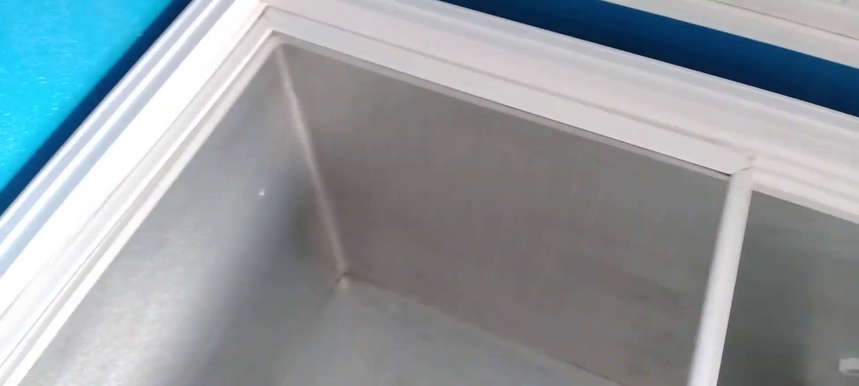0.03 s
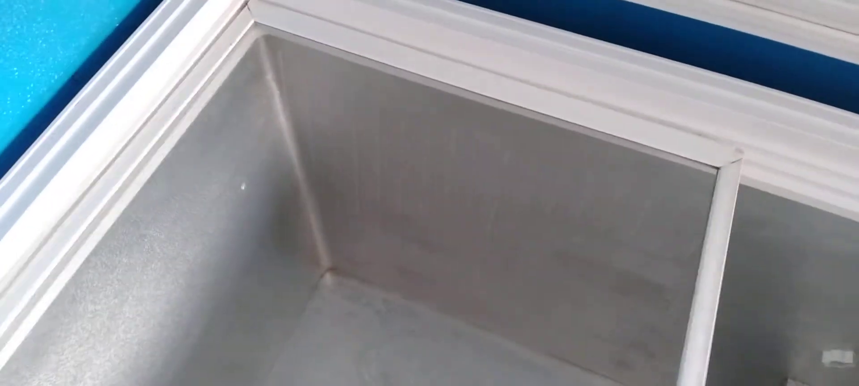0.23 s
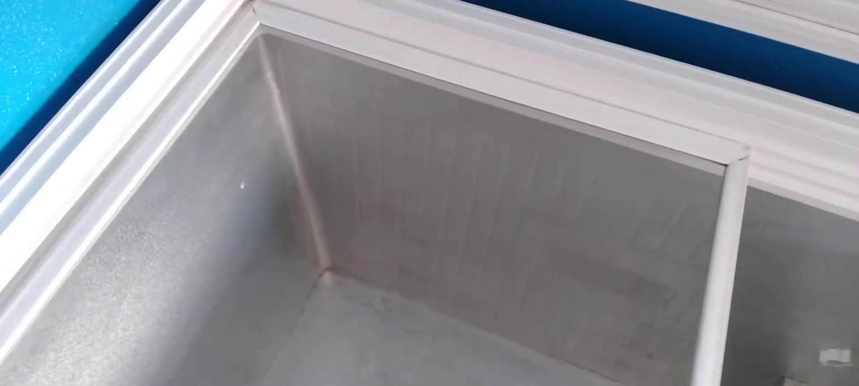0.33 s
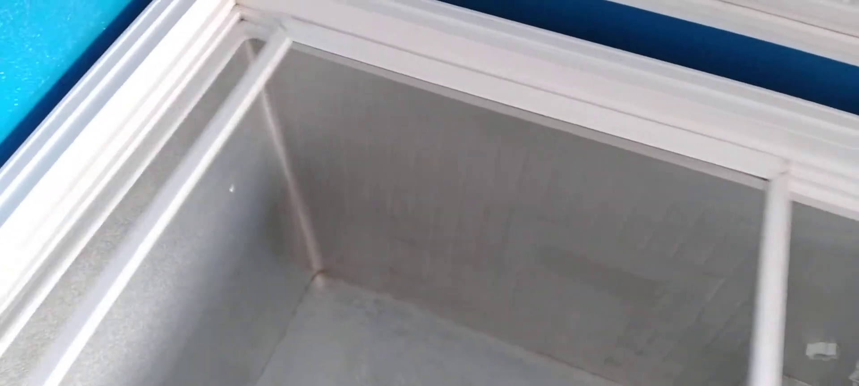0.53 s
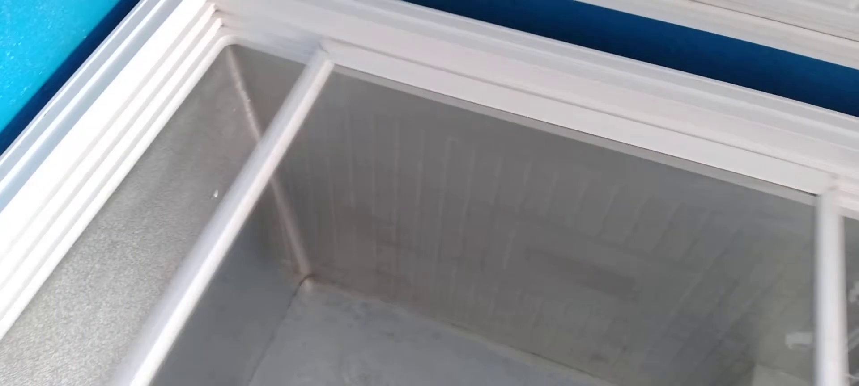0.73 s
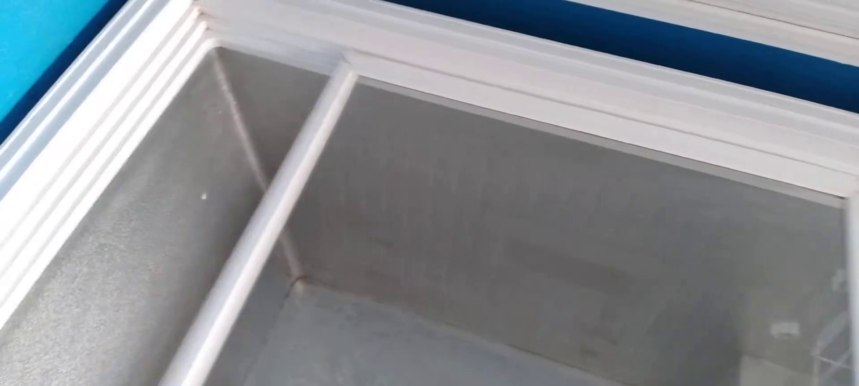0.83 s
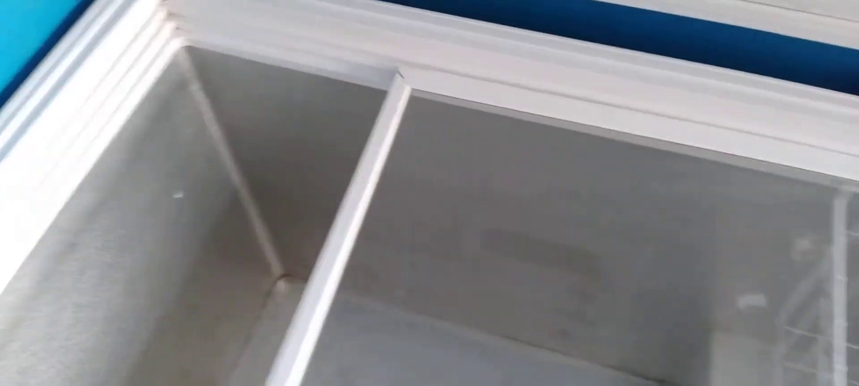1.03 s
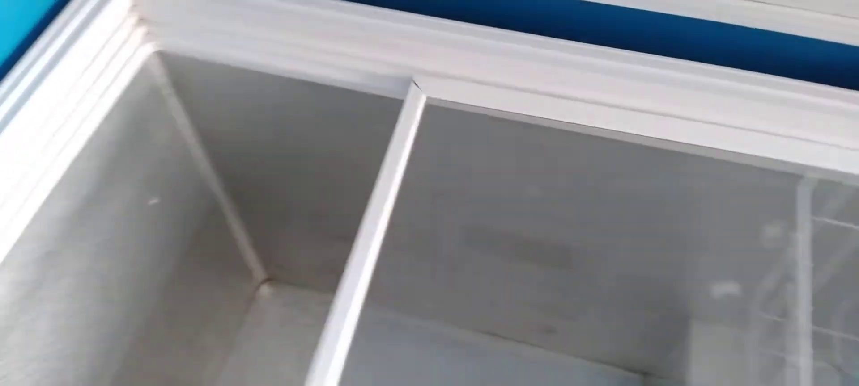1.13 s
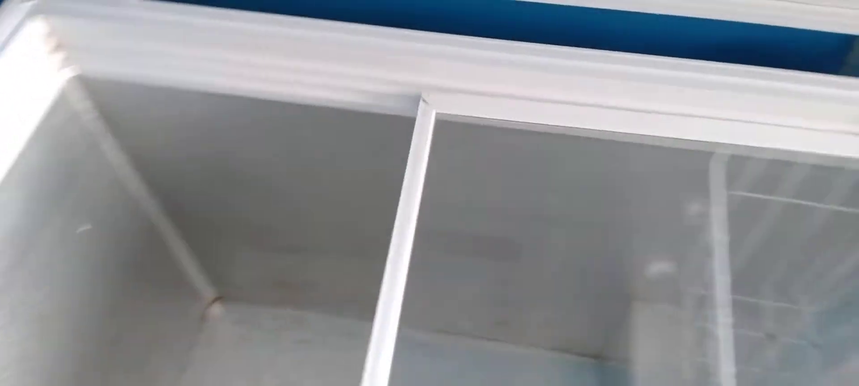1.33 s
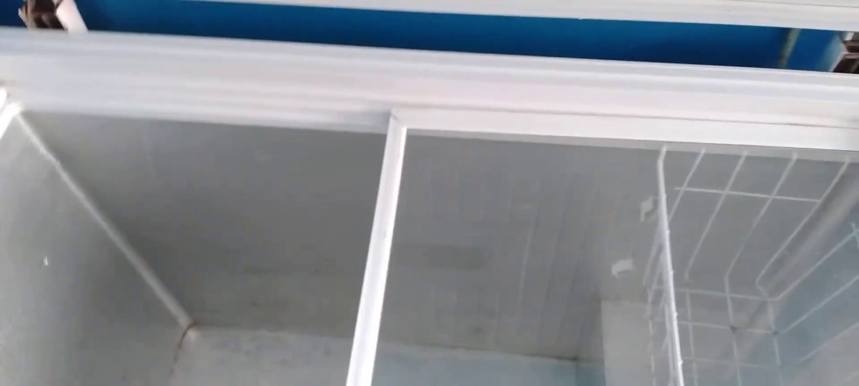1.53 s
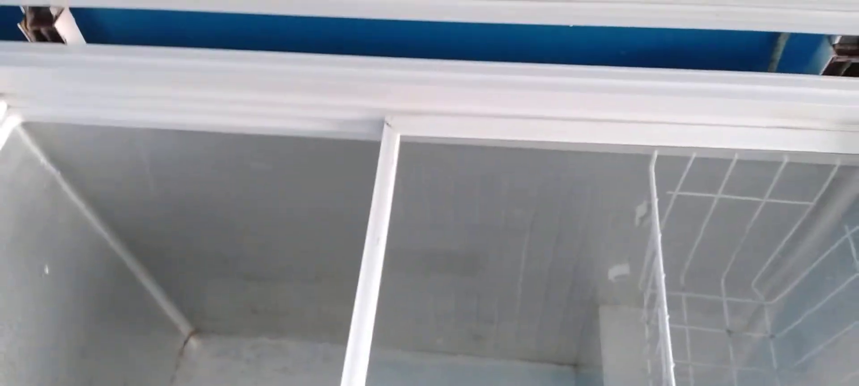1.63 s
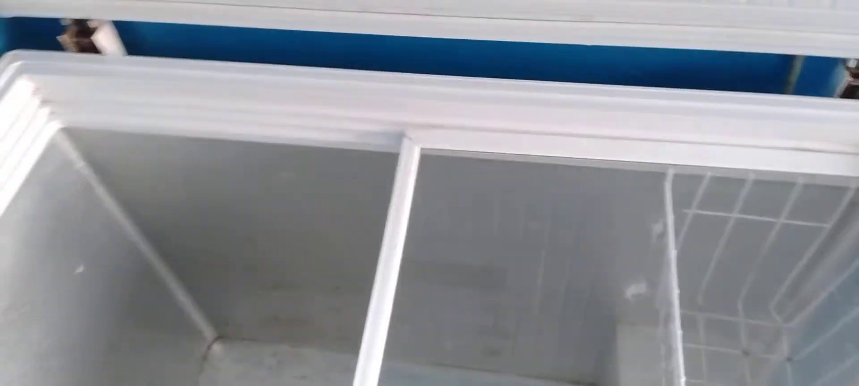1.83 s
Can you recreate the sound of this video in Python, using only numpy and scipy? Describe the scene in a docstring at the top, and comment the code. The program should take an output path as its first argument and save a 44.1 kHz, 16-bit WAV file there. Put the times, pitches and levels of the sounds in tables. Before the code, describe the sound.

Close stereo pickup in a small live room: a glass lid on a hollow cabinet bumps loose, hisses gritty along the track, strikes the end sharply and rattles out, with steady appliance hum and faint whine beneath.

```python
"""Sliding glass lid on a hollow cabinet

A glass lid jerks loose with a few thumps, hisses along its rails, knocks against its stop and leaves ticks.
Blows are soft pushes into cabinet modes plus noise bursts into glass modes; the slide is noise and grit.
Fan noise and a thin motor whine, a sine with its octave, fill the room. Two unlike microphone ports.
"""
import sys
import numpy as np
from scipy import signal
from scipy.fft import rfft, irfft
from scipy.io import wavfile
from scipy.ndimage import uniform_filter1d

SR = 44100
rng = np.random.default_rng(int(sys.argv[2]) if len(sys.argv) > 2 else 0)


def to_wav(sig):
    """Store sig (one row per channel, or 1-D mono) as 16-bit WAV at the path in sys.argv[1].

    Samples outside -1..1 are clipped; the rate is SR.
    """
    pcm = np.clip(np.atleast_2d(sig), -1, 1) * 32767
    pcm = np.round(pcm).astype(np.int16)
    wavfile.write(sys.argv[1], SR, pcm.T)  # frames by channels


N = 83790
TIME_S = np.arange(N) / SR
BINS_HZ = np.fft.rfftfreq(2 * N, 1 / SR)
STOP_AT_S = 1.403  # lid meets its stop


def amp(db):
    """dB to gain."""
    return 10 ** (np.asarray(db) / 20)


def evened(x):
    """Scales to rms 1."""
    return x / np.sqrt(np.mean(x ** 2) + 1e-20)


def read(points, hz):
    """Interpolates a table over log frequency."""
    f, value = np.transpose(points)
    return np.interp(np.log(hz + 1), np.log(f + 1), value)


def curve(rows, column):
    """Interpolates one table column over time."""
    rows = np.array(rows)
    return np.interp(TIME_S, rows[:, 0], rows[:, column])


def colour(x, db):
    """Filters by a gain in dB on the bins of a doubled-length spectrum."""
    return irfft(rfft(x, 2 * N) * amp(db), 2 * N)[..., :N]


def convolved(x, response):
    """Convolves along time, cut to the scene length."""
    return signal.fftconvolve(x, response, axes=1)[:, :N]


def highpass(x, order, cutoff_hz):
    """Butterworth high-pass."""
    return signal.sosfilt(signal.butter(order, cutoff_hz, 'high', fs=SR, output='sos'), x)


# Left-right likeness. Each row: frequency in Hz, correlation from -1 to 1.
LIKENESS = [(60, 0.98), (150, 0.94), (380, 0.91), (950, 0.12), (2380, -0.081), (5980, 0.0034),
            (15000, 0.055)]


def pair(a, b):
    """Two ports: alike in the bass, nearly unrelated in the treble."""
    same = np.clip(read(LIKENESS, BINS_HZ), -1, 1)
    spectrum = same * rfft(a, 2 * N) + np.sqrt(1 - same ** 2) * rfft(b, 2 * N)
    return np.array([a, irfft(spectrum, 2 * N)[:N]])


RISE_CYCLES = 0.31


def ring(modes):
    """Half a second of dying sines; each takes part of a cycle to build up."""
    t = np.arange(SR // 2) / SR
    total = np.zeros(len(t))
    for hz, db, t60_s in modes:
        decay = amp(db - 60 * t / t60_s)
        rise = 1 - np.exp(-t * hz / RISE_CYCLES)
        total += decay * rise * np.sin(2 * np.pi * hz * t)
    return total


def grit(per_s, spread_db):
    """Sparse clicks at random times, of uneven size."""
    size = rng.standard_normal((2, N)) * amp(spread_db * rng.exponential(1, (2, N)))
    return size * (rng.random((2, N)) < per_s / SR)


# Room decay. Each row: frequency in Hz, t60 in s.
ROOM_DECAY = [(500, 0.49), (2000, 0.39), (5000, 0.35), (9000, 0.35), (14000, 0.31)]


def room(x):
    """Noise tail, each band dying at its own speed, another for each port."""
    hz, t, bands = signal.stft(rng.standard_normal((2, SR // 2)), SR, nperseg=128)
    bands = bands * amp(-60 * t / read(ROOM_DECAY, hz)[:, None])
    tail = signal.istft(bands, SR, nperseg=128)[1]
    return convolved(x, tail / np.linalg.norm(tail[0]))


# Fan spectrum. Each row: frequency in Hz, relative level in dB.
FAN_COLOUR = [(25, 4), (68, 2), (96, -13), (133, -10.5), (215, -16.5), (289, -13.5), (378, -12),
              (523, -17.5), (1050, -25.5), (1660, -23), (3500, -33), (4500, -39.5), (5300, -25.5),
              (6000, -34.5), (7000, -35.5), (8800, -51), (10400, -40.5), (12000, -59), (15500, -68)]
# Whine fundamental. Each row: time in s, rms level in dB before the ports.
WHINE_LEVEL = [(0, -65), (.3, -63.5), (.55, -63.5), (.66, -57), (.8, -55.5), (.92, -60.5), (1.1, -67),
               (1.5, -65.5), (1.75, -68), (1.85, -62.5)]
FAN_DB, WHINE_HZ, OCTAVE_DB = -41.5, 1708, -69


def appliance():
    """Steady coloured fan noise; whine as a sine of varying level with a steady octave."""
    fan = evened(pair(*colour(rng.standard_normal((2, N)), read(FAN_COLOUR, BINS_HZ))))
    phase = 2 * np.pi * WHINE_HZ * TIME_S
    fundamental = amp(curve(WHINE_LEVEL, 1)) * np.sin(phase)
    octave = amp(OCTAVE_DB) * np.sin(2 * phase)
    return amp(FAN_DB) * fan + np.sqrt(2) * (fundamental + octave)


# Faint ticking after the knock. Each row: time in s, relative level in dB.
CHATTER_LEVEL = [(1.58, -58.5), (1.63, -54.5), (1.68, -52), (1.72, -49), (1.77, -54.5), (1.8, -53.5),
                 (1.85, -61), (1.9, -73)]
CHATTER_HZ, CHATTER_WIDTH_HZ = 2416, 520
CHATTER_PER_S, CHATTER_SPREAD_DB = 280, 2  # rate per grit channel


def chatter():
    """Sparse small ticks ring two dull bands."""
    t = np.arange(600) / SR
    band_hz = CHATTER_HZ + CHATTER_WIDTH_HZ * np.array([[-.6], [.35]])
    tick = np.exp(-np.pi * 250 * t) * np.sin(2 * np.pi * t * band_hz)
    ticks = convolved(grit(CHATTER_PER_S, CHATTER_SPREAD_DB), tick)
    started = TIME_S > CHATTER_LEVEL[0][0]
    ticks = evened(ticks.sum(0)) * amp(curve(CHATTER_LEVEL, 1)) * started
    return .5 * ticks + room(np.array([ticks, ticks]))


# Slide of the lid. Each row: time in s, relative scrape level in dB, relative rumble level in dB.
SLIDE_LEVELS = [(.2, -68, -31), (.26, -52, -28.5), (.36, -67, -21), (.45, -52, -35), (.55, -52.5, -44),
                (.64, -53, -41), (.8, -52, -40.5), (.9, -49, -43), (1.02, -50, -39.5), (1.08, -53.5, -51),
                (1.12, -45, -56), (1.15, -45, -52), (1.2, -45, -50.5), (1.235, -40, -41),
                (1.27, -41.5, -59), (1.32, -45, -34), (1.36, -41, -46), (1.4, -42.5, -44)]
STOP_FADE_S = 0.012


def moving():
    """Slide gate: ramps up around the first row, decays exponentially after the stop."""
    start = np.clip((TIME_S - SLIDE_LEVELS[0][0] + 0.036) / 0.056, 0, 1)
    return start * np.exp(-np.maximum(TIME_S - STOP_AT_S, 0) / STOP_FADE_S)


# Rail hiss spectrum. Each row: frequency in Hz, relative level in dB.
SCRAPE_COLOUR = [(410, -43), (700, -18), (1450, -15.5), (1670, -22), (1800, -10), (2730, -8), (3730, -3.5),
                 (5080, -6.5), (7030, -3), (8760, -18), (10400, -16), (12400, -29), (15500, -29)]
GRIT_PER_S, GRIT_SPREAD_DB, GRIT_SHARE = 1800, 2.5, 0.34
PATCHY_DB = 1  # rms level wander


def scrape():
    """Hiss and fine grit from the rails, following the pressure of the slide."""
    grains = evened(grit(GRIT_PER_S, GRIT_SPREAD_DB))
    rub = (1 - GRIT_SHARE) * rng.standard_normal((2, N)) + GRIT_SHARE * grains
    rub = evened(colour(rub, read(SCRAPE_COLOUR, BINS_HZ) - 30 * (BINS_HZ < 600)))
    rub = rub * amp(curve(SLIDE_LEVELS, 1)) * moving()
    lumps = uniform_filter1d(uniform_filter1d(rng.standard_normal(N), 900), 900)
    rub = rub * amp(PATCHY_DB * evened(lumps))
    return pair(*(1.27 * rub + 0.52 * room(rub)))


# Blows of the lid on its frame. Each row: start in s, relative thump level in dB,
# relative clack level in dB, contact time in ms.
LID_BLOWS = [(0.2262, -20.5, -36, 2.74), (0.2717, -28, -24.5, 2.3), (0.3072, -23.5, -31.5, 0.92),
             (.311, -8.5, -22, 3.11), (0.319, -14.5, -30, 4.5), (.343, -5, -16.5, 2.56),
             (.352, -12.5, -33, 2.8), (.36, -18, -23.5, 6.9), (0.398, -16, -26.5, 4.4),
             (.497, -29, -67, 2.84), (0.722, -47, -66, 4.9), (0.958, -36, -56, 2.1),
             (1.4025, -16, -19.5, 0.36), (1.407, -19, -7.5, 3.7), (1.4082, -22, -7.5, 0.77),
             (1.413, -8, -9, 2.96), (1.419, -25, -11.5, 1.55), (1.432, -11.5, -22.5, 2.23),
             (1.442, -15, -22, 1.25), (1.466, -13, -51, 2), (1.479, -11, -18.5, 2.82),
             (1.52, -28.5, -36, 1.8), (1.543, -20.5, -32, 2.7), (1.601, -28, -36.5, 2.45),
             (1.655, -38.5, -46, 3.3), (1.699, -47.5, -41, 2.4), (1.714, -33, -49, 2.2),
             (1.876, -35.5, -44, 1.8)]
# Cabinet modes. Each row: frequency in Hz, relative level in dB struck at the closed end,
# relative level in dB struck at the stop, t60 in s of the undamped ring.
CABINET_MODES = [(43.7, -5, -2, 0.18), (58.8, -11, -5, 0.42), (72.72, -4, -5, 0.52),
                 (83.35, -0.5, -5.5, 0.38), (102, -4, -5, 0.067), (143.17, -4, -0.5, 0.27),
                 (206.8, -20.5, -8.5, 0.2), (253.6, -13, -2, 0.16), (281.2, -8, -9, 0.2),
                 (306, -8.5, -6, 0.084), (369.7, -7, -6.5, 0.126), (404.8, -17.5, -14.5, 0.14),
                 (474.8, -13, -13.5, 0.16), (500.6, -48, -10.5, 0.068), (735, -10, -14, 0.078),
                 (1175, -8, -10, 0.099)]
DRAG_DAMPING = 0.46  # t60 factor: the lid's weight shortens the ring while it slides
BOOM_ROOM_DB, BOOM_ROOM_HZ = -6, 148  # the room fills in above this pitch


def cabinet():
    """Soft downward pushes at each blow, and the drag of the lid, ring the hollow body."""
    push = np.zeros((2, N))  # closed end, stop
    for start_s, thump_db, _, contact_ms in LID_BLOWS:
        u = np.clip((TIME_S - start_s) / (contact_ms / 1000), 0, 1)
        unit_area = np.sin(np.pi * u) ** 2 * 2000 / (contact_ms * SR)
        push[int(start_s > STOP_AT_S)] -= amp(thump_db) * unit_area
    body = np.array([ring([(m[0], m[end], m[3]) for m in CABINET_MODES]) for end in (1, 2)])
    boom = convolved(push, body).sum(0)

    damped = ring([(m[0], (m[1] + m[2]) / 2, DRAG_DAMPING * m[3]) for m in CABINET_MODES])
    rumble = signal.lfilter([1], [1, -.97], rng.standard_normal((2, N)))
    rumble = rumble * amp(curve(SLIDE_LEVELS, 2)) * moving()
    drag = convolved(rumble, damped[None]) / (np.linalg.norm(damped) * 25)

    upper = highpass(boom, 4, BOOM_ROOM_HZ)
    echo = amp(BOOM_ROOM_DB) * room(np.array([upper, upper]))
    return boom + pair(*(echo + drag))


# Glass and frame modes. Each row: frequency in Hz, relative level in dB, t60 in s.
GLASS_MODES = [(2350, -5, .012), (2900, -7, .012), (3700, -2, .014), (4600, -3, .014), (5300, -4, .01),
               (6930, 2, .016)]
# Clack spectrum. Each row: frequency in Hz, relative level in dB.
CLACK_COLOUR = [(300, 4), (500, -10), (1130, -11.5), (1500, -16), (2500, -12.5), (3700, -11), (4600, -11),
                (6000, -16), (7000, -10), (7800, -17.5), (8800, -27), (10300, -25.5), (12000, -43),
                (15500, -47)]
CLACK_RISE_S, CLACK_DECAY_S = 0.00044, 0.0038
GLASS_DB, SEALED_GLASS_DB, TAIL_DB = -8.5, -14, 0.5  # sealed: extra gain before the stop


def clacks():
    """Noise bursts ring glass and room; blows take turns among three independent noise draws and tails."""
    power = np.zeros((3, N))
    for k, (start_s, _, clack_db, _) in enumerate(LID_BLOWS):
        decay = np.exp(-np.maximum(TIME_S - start_s, 0) / CLACK_DECAY_S)
        rise = np.clip((TIME_S - start_s) / CLACK_RISE_S, 0, 1)
        power[k % 3] += (amp(clack_db) * decay * rise) ** 2
    glass = ring(GLASS_MODES)
    glass = glass[None] / np.linalg.norm(glass)
    glass_gain = amp(GLASS_DB + SEALED_GLASS_DB * (TIME_S < STOP_AT_S))
    shade = read(CLACK_COLOUR, BINS_HZ) - 40 * (BINS_HZ < 400)
    shade -= 10 * np.log10(np.mean(amp(shade) ** 2))  # unit mean power
    out = np.zeros((2, N))
    for turn_power in power:
        hit = 0.59 * np.sqrt(turn_power) * rng.standard_normal((2, N))
        direct = colour(hit, shade) + convolved(hit * glass_gain, glass)
        out += direct + amp(TAIL_DB) * room(direct)
    return pair(*out)


def scene():
    """Sums all sources."""
    return appliance() + chatter() + scrape() + cabinet() + clacks()


# Port mismatch. Each row: frequency in Hz, left minus right in dB.
PORT_LEAN = [(40, -1), (120, -.7), (200, -.2), (330, 1), (500, 0), (770, -.5), (1170, 1), (1790, 2.5),
             (2740, 4.5), (4190, 4), (5500, 7), (6900, 16), (8000, 8), (9800, -6), (12000, -2), (15000, 0)]
LOW_CUT_HZ, EDGE_HZ = 37.7, 15850


def record(dry):
    """Colours each port, then limits the band at both ends."""
    lean = read(PORT_LEAN, BINS_HZ)
    mean_power_db = 10 * np.log10((amp(lean) + amp(-lean)) / 2)
    ports = colour(dry, np.array([lean / 2, -lean / 2]) - mean_power_db / 2)
    ports = highpass(ports, 3, LOW_CUT_HZ)
    lowpass = signal.firwin(511, EDGE_HZ, window=("kaiser", 9), fs=SR)
    return signal.oaconvolve(ports, lowpass[None], "same")


dry = scene()
out = record(dry)
to_wav(out)
```